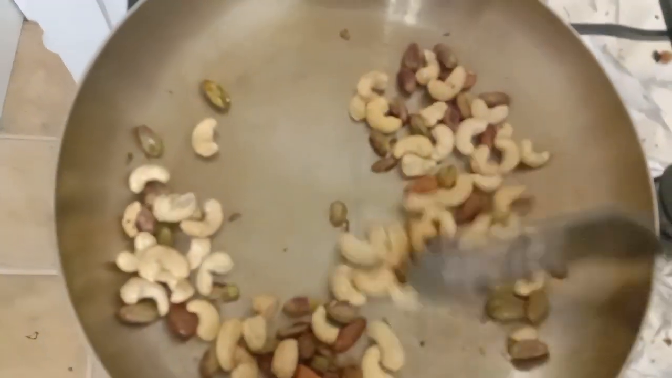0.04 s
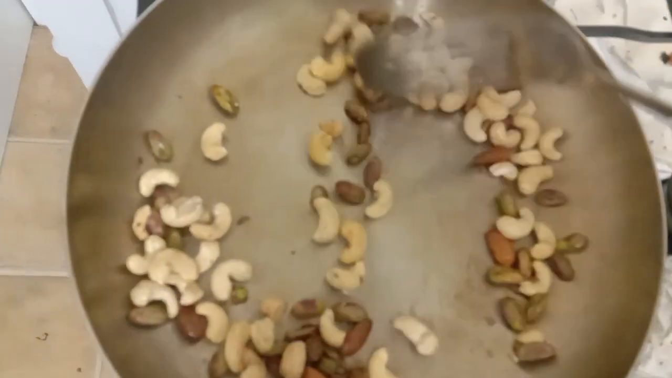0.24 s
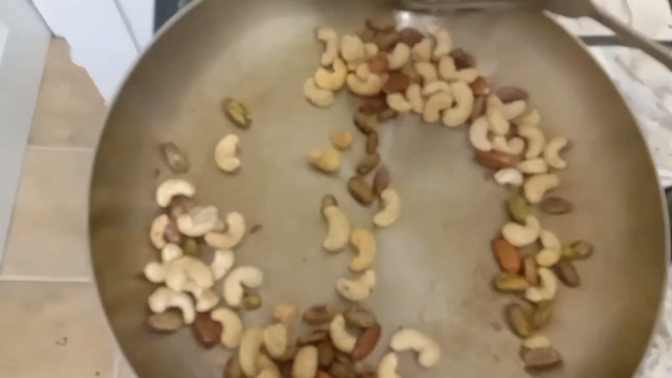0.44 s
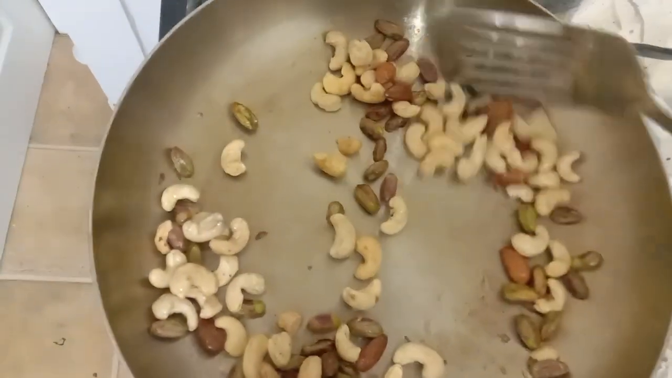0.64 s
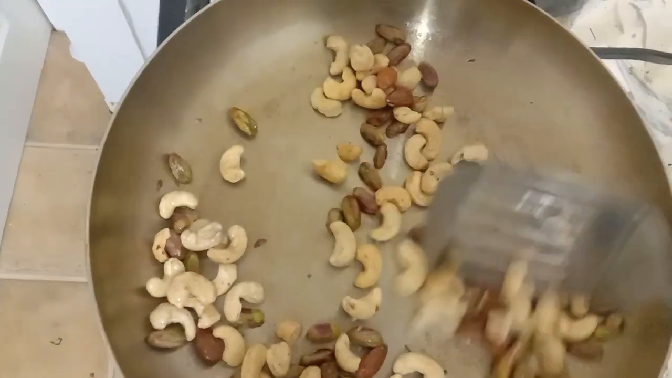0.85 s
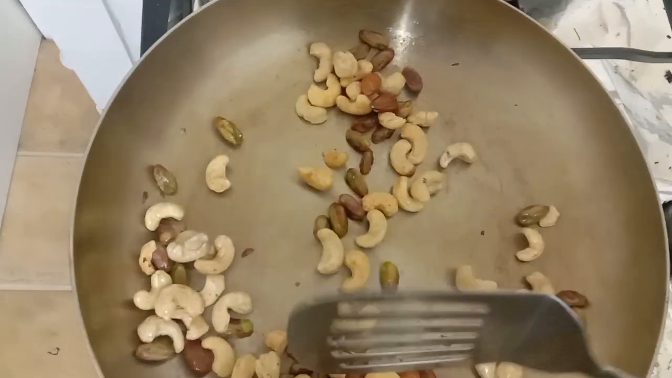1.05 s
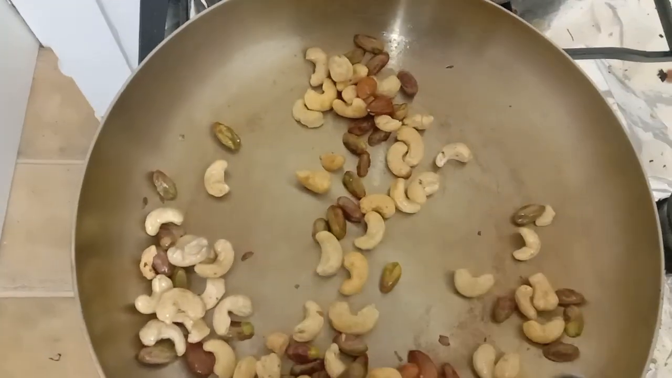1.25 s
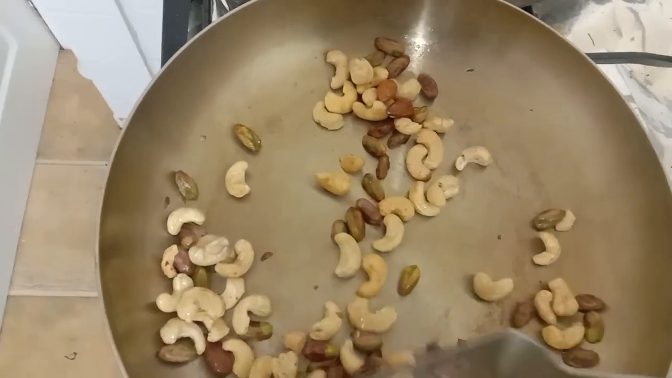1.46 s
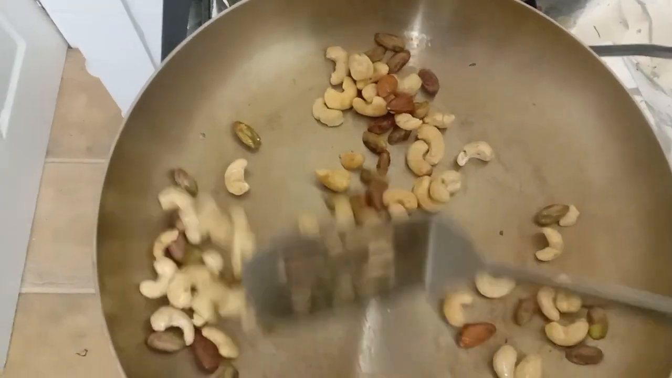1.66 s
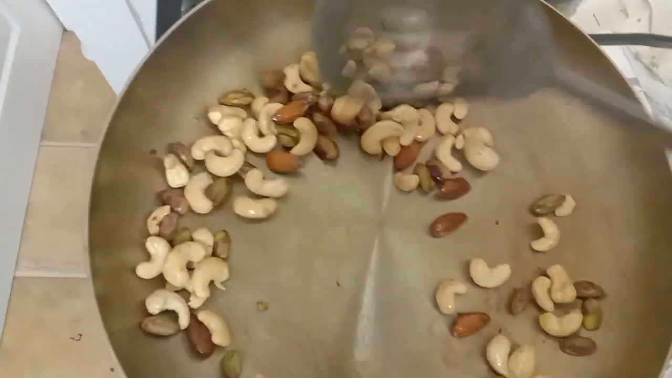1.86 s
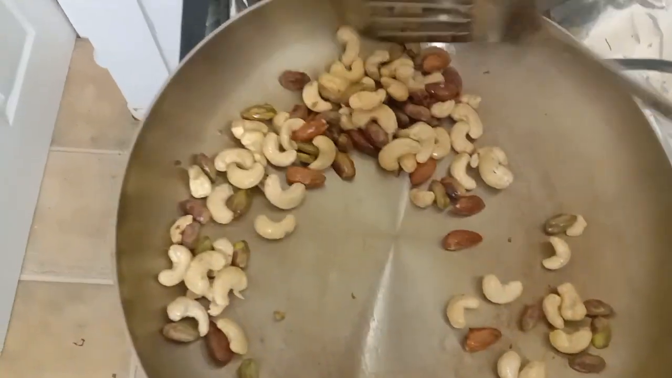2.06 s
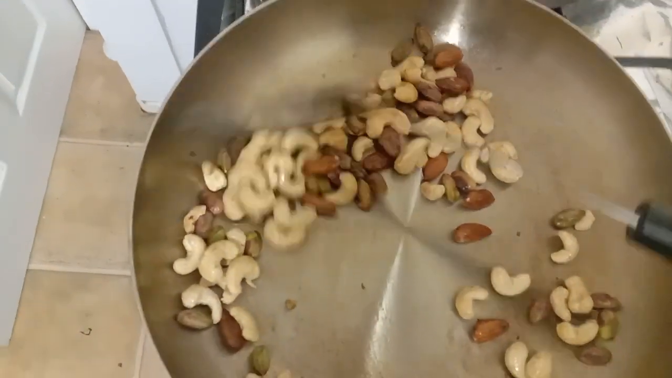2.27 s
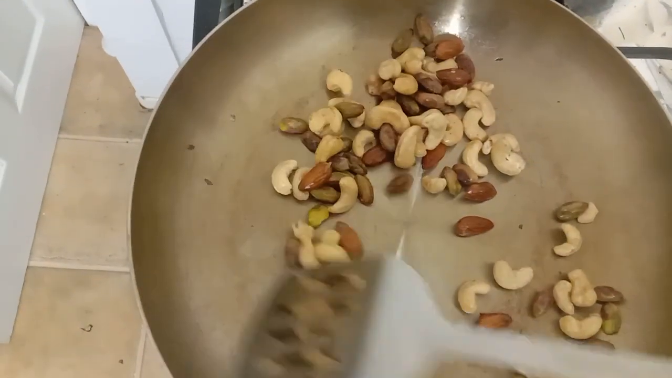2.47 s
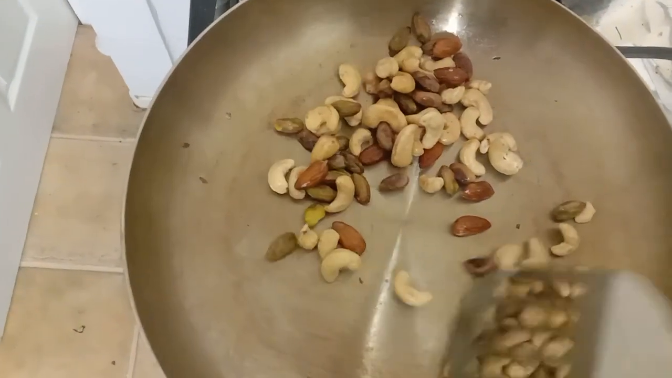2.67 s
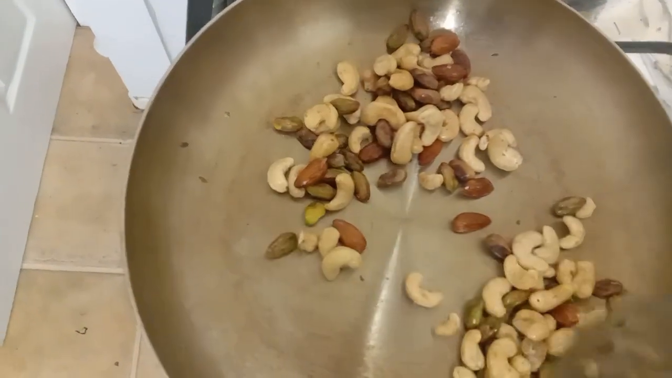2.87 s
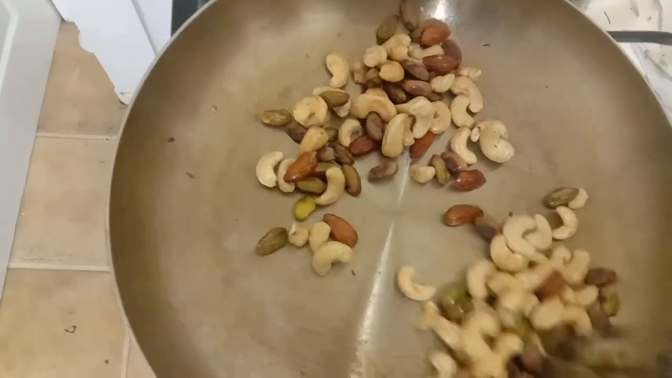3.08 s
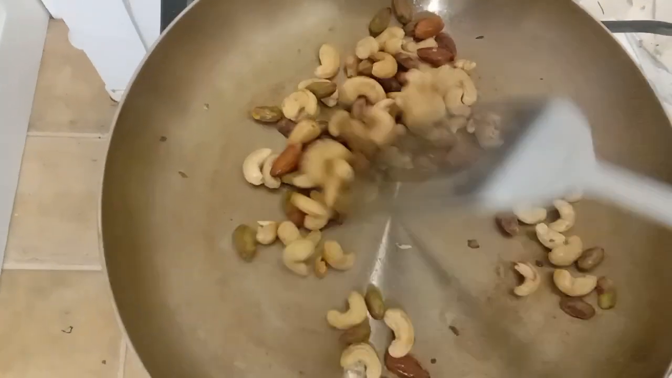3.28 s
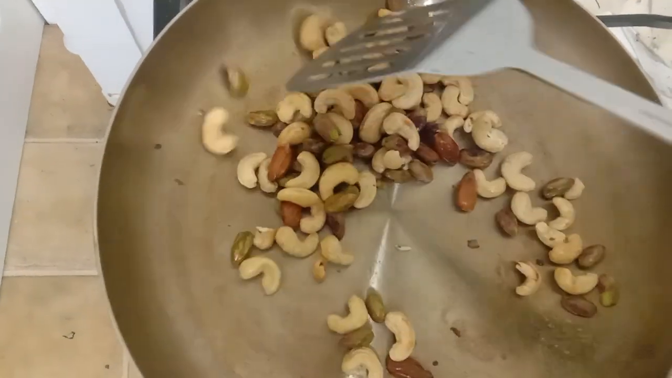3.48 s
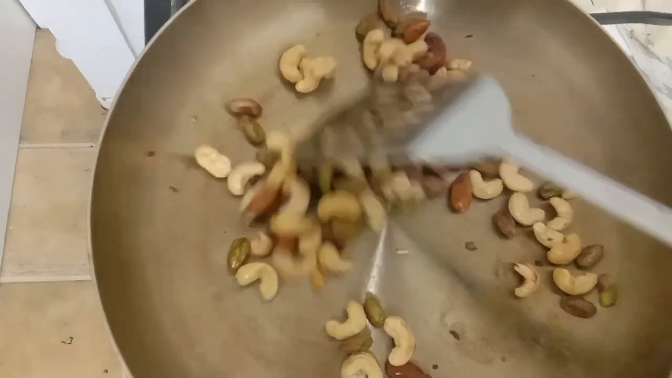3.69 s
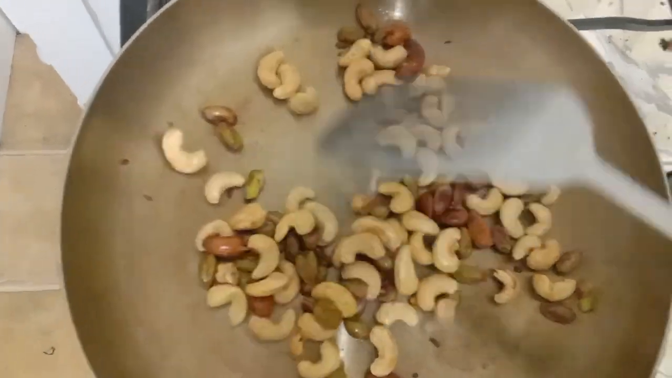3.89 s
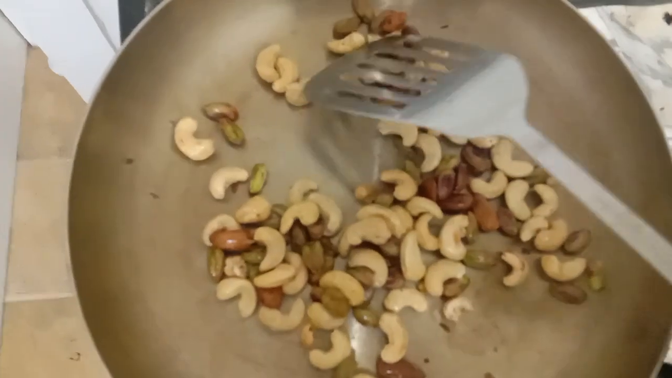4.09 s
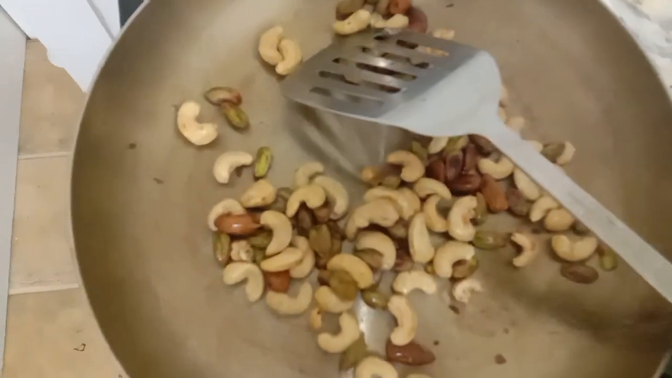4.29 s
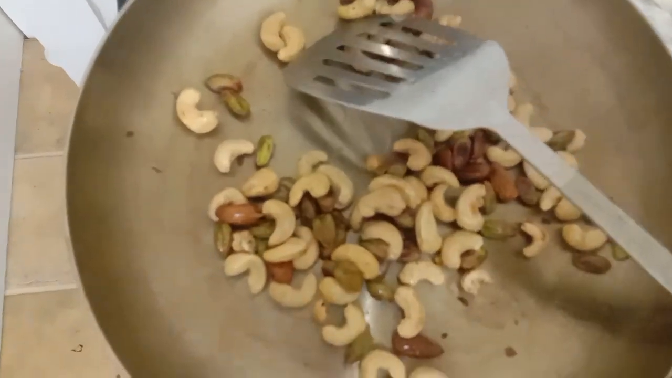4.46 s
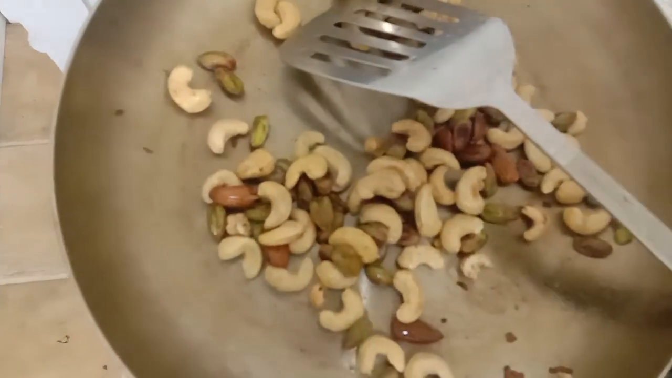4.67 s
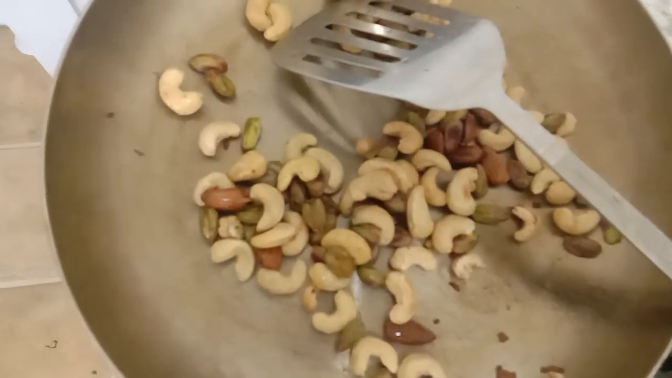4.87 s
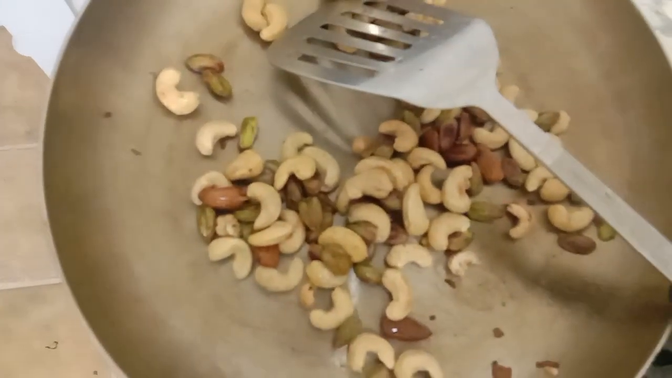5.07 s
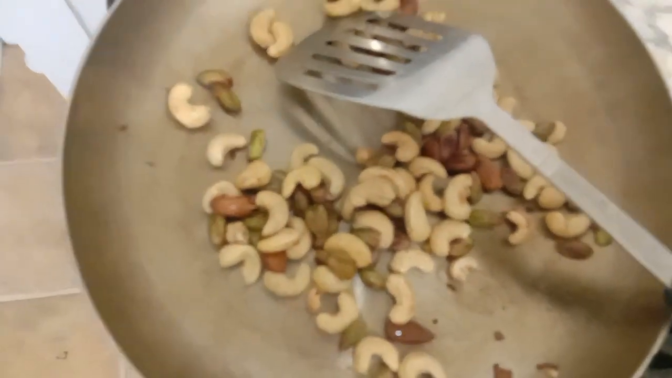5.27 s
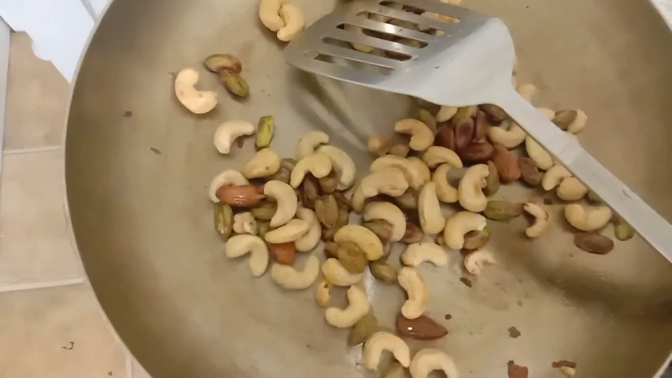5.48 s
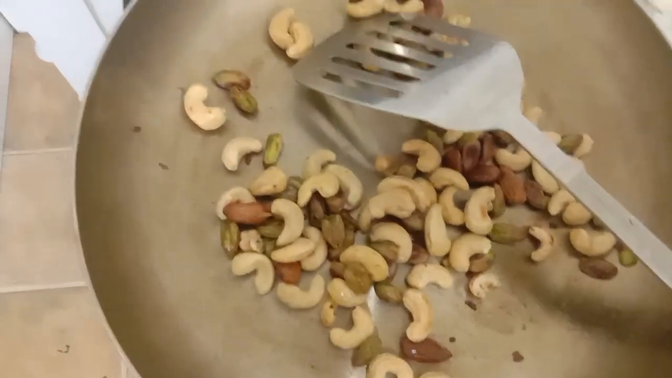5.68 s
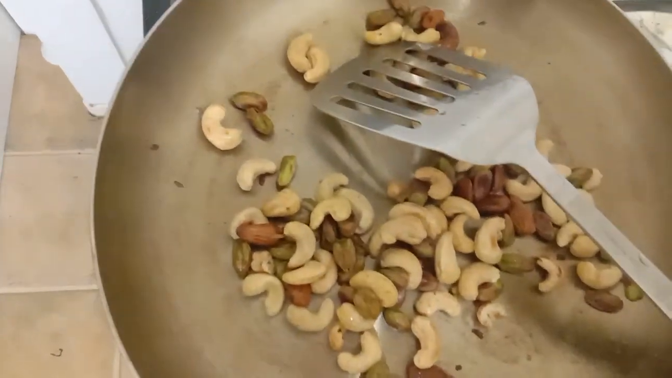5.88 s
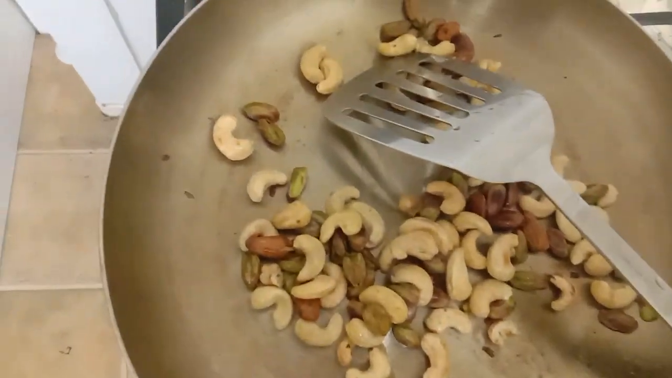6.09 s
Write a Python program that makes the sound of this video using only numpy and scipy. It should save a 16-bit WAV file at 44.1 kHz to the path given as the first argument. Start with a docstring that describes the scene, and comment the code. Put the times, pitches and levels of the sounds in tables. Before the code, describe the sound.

Nuts rattle and knock in a frying pan, stirred by a clattering steel spatula, until a dull clunk and the faint gas hiss stops.

```python
"""Over a hissing gas burner and a faint fizz of oil, a slotted steel spatula stirs nuts in a steel pan.
From the start its blade scrapes by stick-slip friction and the nuts tumble; then it strikes and rebounds,
exciting the modes of pan and blade, while single nuts knock and the pan bumps on its grate. By 4.5 s the
stirring is over and the stove gives a dull clunk. The flame drops, then goes out at 5.4 s; faint clunks
and a dry rustle end the scene. The contact sounds of pan and stove reverberate in a small hard room."""
import sys
import numpy as np
from scipy import signal
from scipy.fft import rfft, irfft
from scipy.io import wavfile

SR = 44100
rng = np.random.default_rng(int(sys.argv[2]) if len(sys.argv) > 2 else 0)


def wrap_up_sound(samples):
    """Save the sound to the file named by the first command line argument, as 16-bit audio."""
    columns = np.atleast_2d(samples).T
    # keep every value between -1 and 1, then stretch to whole-number steps
    tamed = np.clip(columns, -1, 1)
    steps = np.round(tamed * 32767).astype(np.int16)
    wavfile.write(sys.argv[1], SR, steps)


N = 270774
T = np.arange(N) / SR
RING_T = T[:SR // 2]  # time axis of one impact

# resonances of the burner tube: (f/Hz, bandwidth/Hz, level/dB)
TUBE_RESONANCES = [(810, 110, 0.5), (1259, 23, 6.5), (1430, 110, 0), (3030, 120, -7), (3450, 200, -2.5),
                   (5240, 200, -2), (5580, 220, -8.5), (7200, 1100, -17)]
# larger bubbles bursting in the oil: (t/s, level/dB)
OIL_SPITS = [(0.746, -41), (1.196, -55), (1.342, -52.5), (2.11, -53), (3.623, -52), (3.921, -55),
             (4.365, -53), (5.937, -62)]
# spectrum of the bursts: (f/Hz, level/dB)
FIZZ_SPECTRUM = [(2000, -4), (5000, -0.5), (7100, 8), (8000, -8), (10000, 1.5), (13800, -6.5), (15200, 6)]
# joint modes of pan and blade: (f/Hz, level/dB)
PAN_BLADE_MODES = [(339.1, -56), (527.6, -48), (861.3, -47.5), (1195, -42.5), (1287, -44), (1593, -49.5),
                   (1766, -59), (1884, -59.5), (2320, -50.5), (2519, -46), (2912, -48.5), (3424, -45.5),
                   (3941, -62.5), (4140, -55), (4226, -53.5), (4834, -42.5), (5114, -53), (5308, -51.5),
                   (5640, -38.5), (5749, -38.5), (5895, -48), (6336, -55.5), (6433, -49.5), (6541, -47.5),
                   (6874, -41.5), (7187, -53.5), (7596, -56), (8759, -62), (9749, -58), (10826, -63),
                   (11391, -68)]
# spectrum of their dense, weaker modes: (f/Hz, level/dB)
STEEL_SPECTRUM = [(60, -27.5), (130, -19.5), (230, -8), (420, -9.5), (850, -2.5), (1500, -1), (2800, -1),
                  (4100, -3.5), (5700, 1), (7100, -4.5), (8100, -22.5), (10700, -20), (13500, -28),
                  (15200, -16)]
# blade dragged over steel: (start t/s, end t/s, start level/dB, end level/dB, brightness/dB)
SCRAPE_STROKES = [(0, 0.035, -21.5, -36, -1), (0.026, 0.095, -37, -43, 1.5), (0.071, 0.13, -32, -28.5, 0),
                  (0.205, 0.272, -29.5, -40, 2.5), (0.635, 0.758, -36, -47.5, 0),
                  (0.753, 0.81, -44.5, -29, -3.5), (1.526, 1.608, -38, -49, -3),
                  (2.168, 2.274, -44, -40, 2.5), (2.382, 2.504, -51, -39.5, 4.5),
                  (2.506, 2.616, -34, -44.5, 1.5), (3.111, 3.177, -24, -47.5, -0.5)]
# blade pushing the heap of nuts: (start t/s, end t/s, level/dB)
HEAP_PUSHES = [(0, 0.24, -44.5), (0.67, .88, -43.5), (1.45, 1.883, -51.5), (2.315, 2.669, -48),
               (3.18, 3.378, -44.5), (3.698, 3.793, -52)]
# spectrum of a nut against the pan: (f/Hz, level/dB)
NUT_SPECTRUM = [(40, -25), (90, -7), (210, 2), (420, -4.5), (620, 1.5), (900, 5), (1600, -5), (2200, -15.5),
                (3200, -13.5), (5500, -11.5), (7500, -34), (15000, -39.5)]
# blade striking the pan: (t/s, level/dB, pan body/dB, edge sharpness/dB,
# mode favoured by the contact point f/Hz, chatter/dB, free ring/dB)
BLADE_BLOWS = [(0.1632, -15, 2, 2, 861, -11.5, -30), (0.6025, -16, -13, 11, 5640, -20.5, -9.5),
               (0.8216, -23, 4, -6.5, 2519, -28, -27), (1.4661, -24, 2.5, 6.5, 1195, -4, -16.5),
               (2.1749, -23.5, -14, 11.5, 1287, -9.5, -2), (2.476, -16, 1.5, 7.5, 4226, 0.5, -6),
               (2.4893, -21, 4, 1.5, 1287, 0.5, -23), (3.0875, -23, -4.5, 10, 2519, -0.5, -20),
               (3.2044, -12.5, -8.5, 2, 4834, -1.5, -23), (3.2232, -20.5, -10, 0.5, 6433, 2, -22)]
# low drumming modes of the pan floor: (f/Hz, level/dB, t60/s)
PAN_FLOOR_MODES = [(164.3, -6, 0.95), (208.6, 1.5, 0.24), (236.4, -0.5, 0.8), (287, -10.5, 0.13),
                   (531, -3.5, 0.32)]
# single nuts dropping: (t/s, peak level/dB, f/Hz)
NUT_DROPS = [(0.42, -45.5, 1190), (0.96, -29, 923), (1.755, -36.5, 900), (1.845, -36, 970),
             (2.038, -34, 854), (2.681, -36, 914), (3.317, -29.5, 1516), (3.431, -34.5, 946),
             (3.462, -31.5, 1600), (3.485, -32.5, 1644), (3.577, -31.5, 1590), (3.708, -28.5, 1440),
             (3.773, -35.5, 852), (3.836, -27, 1398), (3.856, -29.5, 1130), (3.893, -27, 1193),
             (4.045, -34, 947)]
# pan shifting on its grate: (t/s, level/dB)
GRATE_BUMPS = [(1.001, -52), (1.375, -50.5), (1.449, -53), (2.35, -55.5), (2.767, -55.5), (3.719, -55),
               (4.189, -60.5), (4.515, -48)]
# spectrum of one such bump: (f/Hz, level/dB)
BUMP_SPECTRUM = [(35, -11), (90, 7.5), (170, -3.5), (350, 0), (600, -22.5), (2000, -53.5)]
# blade sliding lightly through the nuts: (start t/s, end t/s, level/dB)
BLADE_SLIDES = [(1.318, 1.318, -47.5), (1.382, 1.46, -58.5)]
# clunks of the stove: (t/s, level/dB, attack/s, treble gain from 2 kHz up/dB)
STOVE_CLUNKS = [(4.512, -31, 0.00084, 9.5), (4.541, -38, 0.0031, -9), (5.312, -49.5, 0.019, 2),
                (5.354, -57, 0.011, -1), (5.829, -68, 0.012, -24.5), (5.989, -52, 0.012, -3.5),
                (6.022, -48.5, 0.0097, -17)]
# modes of the stove body: (f/Hz, level/dB, t60/s before the cap in stove_clunks)
STOVE_BODY_MODES = [(337.6, -4, 0.14), (495, -22, 0.17), (569, -13, 0.23), (967, 2.5, 0.075),
                    (1225, 1.5, 0.17), (1301, -1.5, 0.21), (1540, -20, 0.3), (1943, -18.5, 0.4),
                    (3020, -27.5, 0.57), (3600, -26, 0.28)]
# spectrum of its dense, weaker modes: (f/Hz, level/dB)
STOVE_SPECTRUM = [(40, -35), (90, -17), (300, -7), (600, -9.5), (1000, -8.5), (1800, -15), (2600, -29),
                  (5000, -33.5), (8000, -55)]
# reverberation bands: (low f/Hz, high f/Hz, t60/s, level/dB)
ROOM_BANDS = [(30.2, 350, 0.46, 0), (418, 2500, 0.41, -5.5), (2500, 6600, 0.32, -8.5),
              (7200, 9500, 0.21, -6.5)]
# spectrum of the room's background noise: (f/Hz, level/dB)
AIR_SPECTRUM = [(30, -1.5), (130, 5.5), (700, -3), (1250, -1), (2000, -5.5), (7000, -5.5), (8000, -18),
                (15000, -15.5)]

LOW_FLAME_DB = -5.5 * (T > 4.6)  # burner and resting fizz step down together at 4.6 s


def undb(db):
    """Amplitude ratio of a level in decibels."""
    return np.exp(np.asarray(db) * (np.log(10) / 20))


def unit(x):
    """Normalise to rms 1."""
    return x / np.sqrt(np.mean(x ** 2))


def struck(x):
    """Normalise a transient to rms 1 over its first 20 ms."""
    return x / np.sqrt(np.mean(x[:882] ** 2))


def fade(t60):
    """Exponential damping: 60 dB are lost in t60 seconds."""
    return np.exp(-np.log(1000) * RING_T / max(t60, 1e-3))


def through(x, response):
    """A linear system convolves its excitation with its impulse response."""
    return signal.oaconvolve(x, response)[:len(x)]


def colour(x, points, size=2048):
    """Minimum-phase filter through (f/Hz, gain/dB) points, made causal by folding the cepstrum."""
    hz, db = np.transpose(points)
    bin_hz = np.fft.rfftfreq(size, 1 / SR) + 1
    cepstrum = irfft(np.log(undb(np.interp(np.log(bin_hz), np.log(hz), db))))
    cepstrum[1:size // 2] *= 2
    cepstrum[size // 2 + 1:] = 0
    return through(x, irfft(np.exp(rfft(cepstrum))))


def add(out, s, sound):
    """Superpose a sound from time s on."""
    i = max(int(s * SR), 0)
    out[i:i + len(sound)] += sound[:max(N - i, 0)]


def clicks(rate, spread_db):
    """Poisson impulses, rate per second, of random sign and size; rms 1."""
    chance, size, sign = rng.random(N), rng.standard_normal(N), rng.choice([-1, 1], N)
    return unit((chance < rate / SR) * sign * undb(spread_db * np.clip(size, -2, 2)))


def wander(hz):
    """Slow random fluctuation: low-passed noise of rms 1."""
    return unit(signal.sosfilt(signal.butter(2, hz, fs=SR, output="sos"), rng.standard_normal(N)))


def gesture(start, end, attack_s, release_db_per_s):
    """Envelope that rises to 1 by start, holds until end, then decays exponentially."""
    rise = np.clip((T - start) / attack_s + 1, 0, 1)
    return rise * undb(-release_db_per_s * np.maximum(T - end, 0))


def wash(spectrum, t60):
    """Modal overlap: many close, damped modes merge into decaying noise."""
    return struck(colour(rng.standard_normal(len(RING_T)) * fade(t60), spectrum))


def ring(modes):
    """Free vibration: a sum of damped sinusoids (f/Hz, level/dB, t60/s) in random phase."""
    return struck(sum(undb(db) * np.sin(2 * np.pi * (hz * RING_T + rng.random())) * fade(t60)
                      for hz, db, t60 in modes))


def burner(level_db=-60, flutter_db=1, off_s=5.4, dying_db_per_s=134):
    """Gas flow noise excites the tube's resonances, flutters a little and dies away once shut off."""
    tube = sum(undb(db) * signal.lfilter(*signal.iirpeak(hz, hz / width, fs=SR), rng.standard_normal(N))
               for hz, width, db in TUBE_RESONANCES)
    flame = colour(rng.standard_normal(N), [(40, -3.5), (150, 6.5), (600, 6.5), (2000, -8.5), (7000, -3)])
    hiss = unit(colour(tube + undb(-23) * flame, [(7000, -1.5), (8200, -12.5)]))
    flow_db = level_db + LOW_FLAME_DB - dying_db_per_s * np.maximum(T - off_s, 0)
    return hiss * undb(flow_db + flutter_db * wander(hz=9))


def heap_motion():
    """Agitation of the nuts: the heap yields quickly to each push, then settles exponentially."""
    return sum(undb(db) * gesture(start, end, attack_s=0.058, release_db_per_s=114)
               for start, end, db in HEAP_PUSHES)


def oil_fizz(rest_db=-72.5, stirred_db=-21):
    """Bursting bubbles radiate impulses, louder as stirring spreads fresh oil on the hot steel."""
    frying = undb(rest_db + LOW_FLAME_DB) + undb(stirred_db) * heap_motion()
    pops = (clicks(rate=2000, spread_db=0.5) + .35 * clicks(rate=25, spread_db=13)) * frying
    for s, db in OIL_SPITS:
        add(pops, s, undb(db) * rng.standard_normal(len(RING_T)) * fade(0.014))
    return colour(pops, FIZZ_SPECTRUM)


def steel_response(favoured_hz=1000, lift_db=0, free_db=-9, wash_db=-6, twin_db=-4, scatter_db=3.5):
    """Modal response of pan and blade: contact damping absorbs most of the ring, the rest sings on."""
    hz, db = np.transpose(PAN_BLADE_MODES)
    db = db + lift_db * np.exp(-(np.log(hz / favoured_hz) / 0.0096) ** 2)
    # the pan is not quite round, so each mode splits into a beating pair
    split = .012 * rng.choice([-1, 1], len(hz)) * rng.uniform(0.54, 2, len(hz))
    hz = np.append(hz, hz * (1 + split))
    db = np.append(db, db + twin_db) + scatter_db * rng.standard_normal(len(hz))
    t60 = 0.26 * (hz / 3000) ** -.2
    modes = struck(ring(zip(hz, db, t60)) * (fade(0.092) + undb(free_db)))
    # a blade that bounces free leaves a cleaner note, a pressed one a harsher crack
    crack = undb(wash_db - 0.24 * (free_db + 7.5)) * wash(STEEL_SPECTRUM, t60=0.081)
    return struck(modes + crack)


def blade_scrapes(ramp_s=.004, judder_db=3):
    """Stick-slip friction drives the steel with uneven impulses; each stroke touches another spot."""
    out = np.zeros(N)
    slips = clicks(rate=1100, spread_db=2.5) * undb(judder_db * wander(hz=39))
    for start, end, first_db, last_db, bright_db in SCRAPE_STROKES:
        length = end - start
        pressure = np.interp(RING_T, [0, ramp_s, length, length + ramp_s], [0, 1, 1, 0])
        pressure *= undb(np.interp(RING_T, [0, length], [first_db, last_db]))
        force = slips[int(start * SR):][:len(RING_T)] * pressure
        body = steel_response(free_db=-15, wash_db=-5.5)
        stroke = through(force, body / np.linalg.norm(body))
        tilt = [(200, -1), (1300, -bright_db), (5500, bright_db), (11000, 2 * bright_db + 3)]
        add(out, start, colour(stroke, tilt))
    return out


def pan_under_nut(level_db=-5):
    """A light, soft body excites mainly the lower modes of the pan."""
    softness = [(300, 0), (1600, -3), (3000, -10), (4500, -8), (7000, -25)]
    return undb(level_db) * struck(colour(steel_response(), softness))


def tumbling_nuts(shapes=4):
    """Random collisions of nuts of several shapes add incoherently, scaled by the heap's motion."""
    out, motion = np.zeros(N), heap_motion()
    for _ in range(shapes):
        pan = pan_under_nut()
        body = colour(wash(NUT_SPECTRUM, t60=0.044), [(1700, -6), (4000, -4.5)]) + pan
        out += through(clicks(rate=35, spread_db=4.5) * motion, body / np.linalg.norm(body))
    return out / np.sqrt(shapes)


def blade_blows(rebounds=6, rebound_decay_s=0.0053):
    """Impact excitation: a hard contact and quick elastic rebounds ring the steel and the pan floor."""
    out = np.zeros(N)
    for s, db, body_db, edge_db, favoured_hz, chatter_db, free_db in BLADE_BLOWS:
        force = np.zeros(len(RING_T))
        lag = np.cumsum(rng.uniform(.0005, .003, rebounds))
        chatter = undb(chatter_db) * rng.choice([-1, 1], rebounds) * np.exp(-lag / rebound_decay_s)
        force[(lag * SR).astype(int)] = chatter
        force[0] = 1
        hit = struck(through(steel_response(favoured_hz, lift_db=9, free_db=free_db), force))
        # the hand's shove gives the lows: steadier than the clang, firmest on a clean edge contact
        shove_db = -13 + 0.52 * db + .25 * edge_db
        spectrum = [(100, shove_db - 3), (300, shove_db), (1300, db + body_db),
                    (5500, db), (11000, db + edge_db)]
        add(out, s, colour(hit, spectrum))
        add(out, s, undb(-52 + 0.39 * edge_db) * ring(PAN_FLOOR_MODES))
    return out


def nut_knocks(t60=0.067, treble_db_per_octave=22.5):
    """Heavily damped modes give a short tock; smaller, harder nuts sound higher and brighter."""
    out, pan = np.zeros(N), pan_under_nut()
    for s, db, hz in NUT_DROPS:
        low_hz, high_hz = hz * rng.uniform(0.38, 0.39), hz * rng.uniform(1.7, 2.5)
        shell = ring([(hz, 0, t60), (low_hz, -4, t60), (high_hz, -4, t60)])
        tock = wash(NUT_SPECTRUM, t60=0.075) + undb(-1) * shell + pan
        treble_db = -16 + treble_db_per_octave * np.log2(hz / 1000)
        tock = colour(tock, [(300, -15), (800, 1), (2000, 3.5), (4000, treble_db + 5.5),
                             (6000, treble_db - 2), (9000, treble_db - 24.5)])
        add(out, s, undb(db) * tock / np.abs(tock).max())
    return out


def pan_bumps(attack_s=0.013):
    """Soft contact of the heavy pan with its grate excites low frequencies."""
    out = np.zeros(N)
    for s, db in GRATE_BUMPS:
        add(out, s, undb(db) * wash(BUMP_SPECTRUM, t60=0.2) * (1 - np.exp(-RING_T / attack_s)))
    return out


def nut_slides():
    """Sliding friction: tiny contacts of dry nut skins with the blade merge into a swish."""
    contact = sum(undb(db) * gesture(start, end, attack_s=0.0056, release_db_per_s=350)
                  for start, end, db in BLADE_SLIDES)
    spectrum = [(900, -10), (2200, -0.5), (4700, 1.5), (6000, -20), (9000, -29)]
    return contact * unit(colour(clicks(rate=4900, spread_db=2.5), spectrum))


def stove_clunks(max_t60=.3):
    """Dull clunks from the stove's damped modes, each with its own attack and brightness."""
    out = np.zeros(N)
    for s, db, attack_s, treble_db in STOVE_CLUNKS:
        modes = ring((hz, mode_db, min(t60, max_t60)) for hz, mode_db, t60 in STOVE_BODY_MODES)
        body = modes + undb(-5) * wash(STOVE_SPECTRUM, t60=0.2)
        clunk = struck(colour(body, [(350, 0), (2000, treble_db)]))
        add(out, s, undb(db) * clunk * (1 - np.exp(-RING_T / attack_s)))
    return out


def rustle(s=6.092, level_db=-51.5):
    """Shot noise: a brief burst of dense impulses is heard as a dry, bright crackle."""
    spectrum = [(1000, -19), (6000, -1), (8000, -13), (11000, 0.5), (13500, -9), (15200, -1)]
    crackle = unit(colour(clicks(rate=3300, spread_db=5), spectrum))
    return undb(level_db) * gesture(s, s, attack_s=0.0049, release_db_per_s=122) * crackle


def reverberate(x, first_echo_s=0.0052):
    """Reflections from tiles and cupboards add a diffuse tail in which the lows decay slowest."""
    tail, build_up = 0, np.clip(RING_T / first_echo_s - 1, 0, 1)
    for low_hz, high_hz, t60, db in ROOM_BANDS:
        band = signal.butter(3, [low_hz, high_hz], "band", fs=SR, output="sos")
        echoes = rng.standard_normal(len(RING_T)) * fade(t60) * build_up
        tail = tail + undb(db) * signal.sosfilt(band, echoes / np.linalg.norm(echoes))
    return x + through(x, tail)


def scene():
    """Superposition of reverberant contact sounds, direct burner, fizz and rustle, and room noise."""
    air = undb(-78) * unit(colour(rng.standard_normal(N), AIR_SPECTRUM))
    background = air + burner() + oil_fizz()
    stirring = blade_scrapes() + tumbling_nuts() + blade_blows() + nut_knocks()
    contacts = stirring + pan_bumps() + nut_slides() + stove_clunks()
    return (background + reverberate(contacts) + rustle())[None]


def record(dry, rumble_hz=65, top_hz=15700):
    """A band-limited, saturating microphone sheds deep bass, rounds the peaks and cuts the top."""
    x = signal.sosfilt(signal.butter(3, rumble_hz, "high", fs=SR, output="sos"), dry)
    return signal.sosfilt(signal.ellip(10, .2, 70, top_hz, fs=SR, output="sos"), np.tanh(x))


dry = scene()
out = record(dry)
wrap_up_sound(out)
```